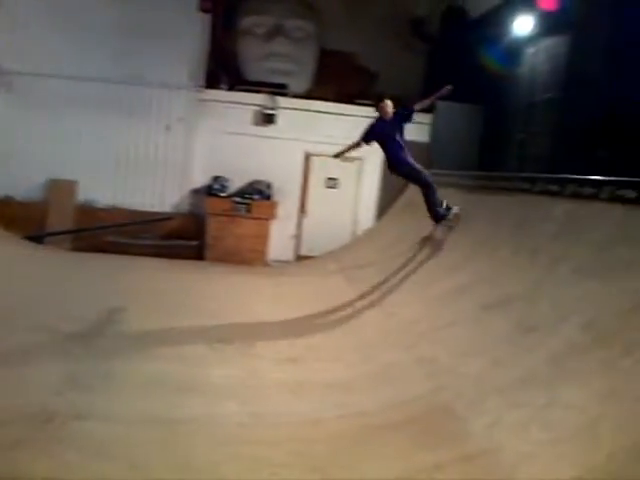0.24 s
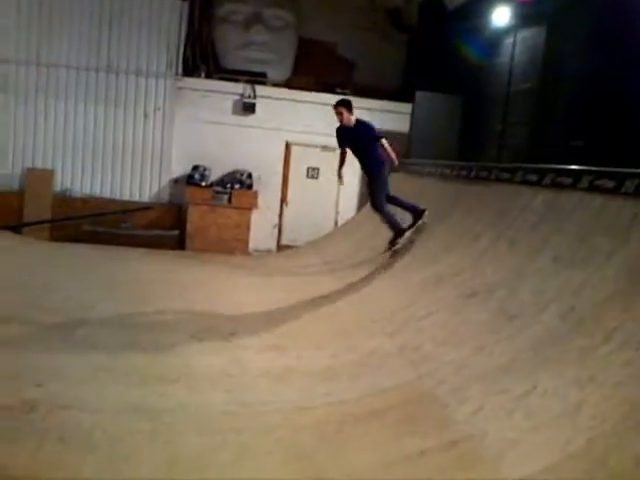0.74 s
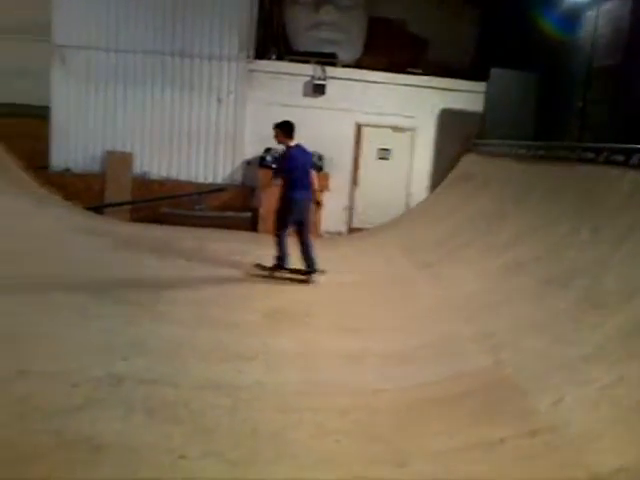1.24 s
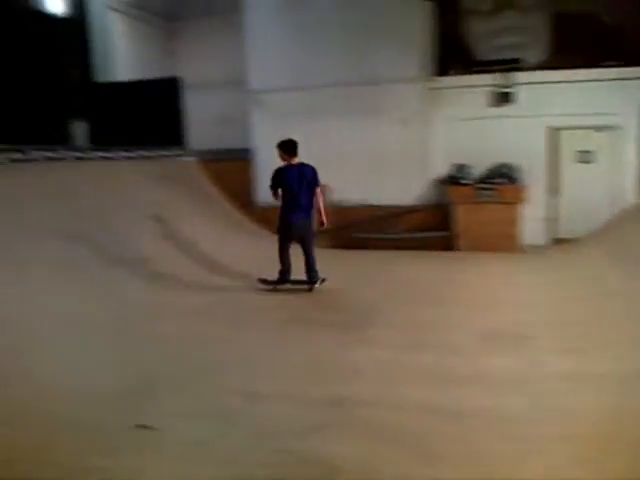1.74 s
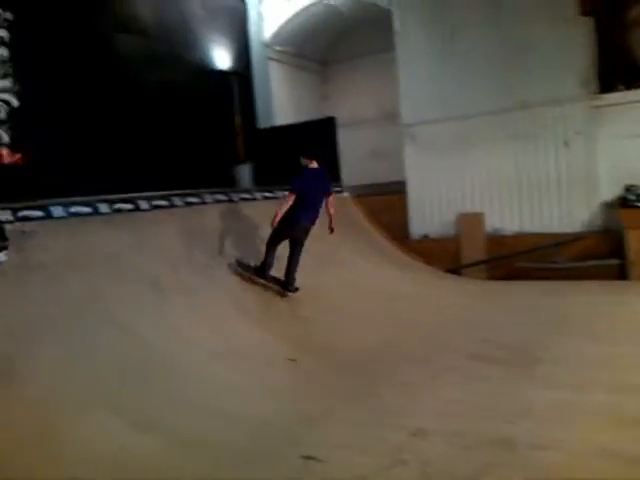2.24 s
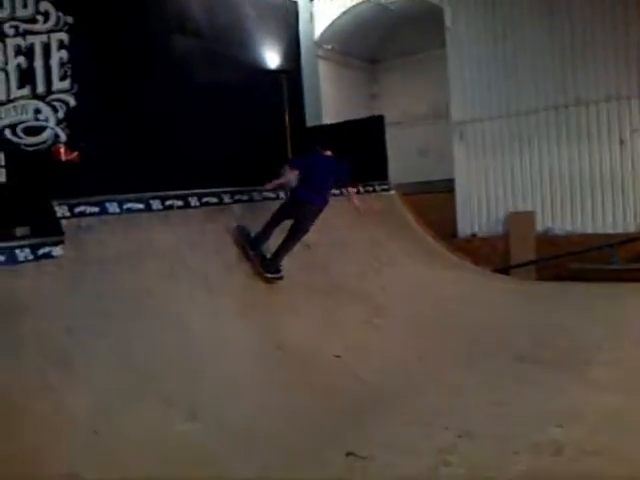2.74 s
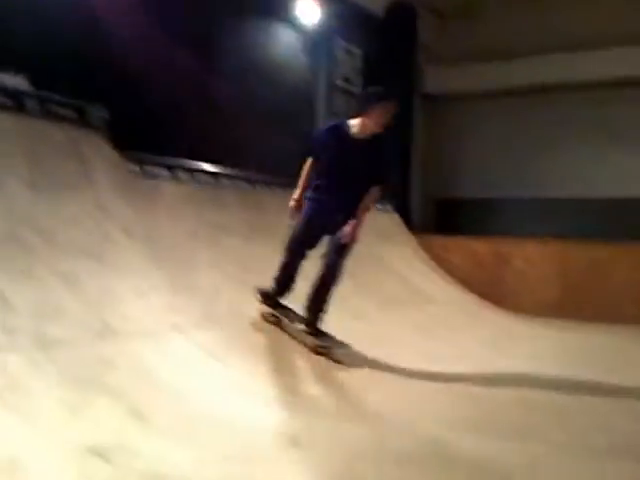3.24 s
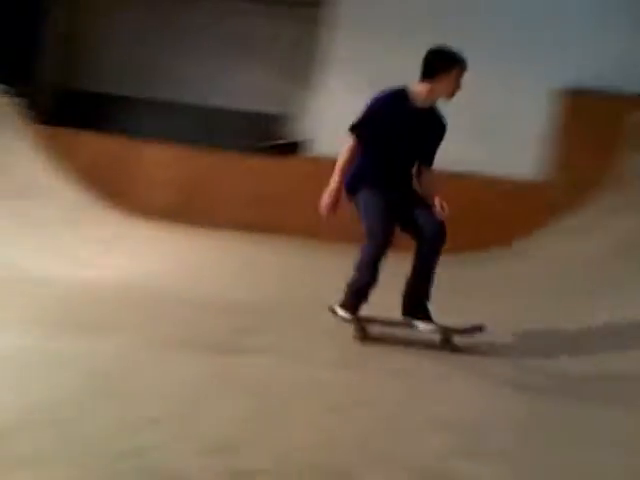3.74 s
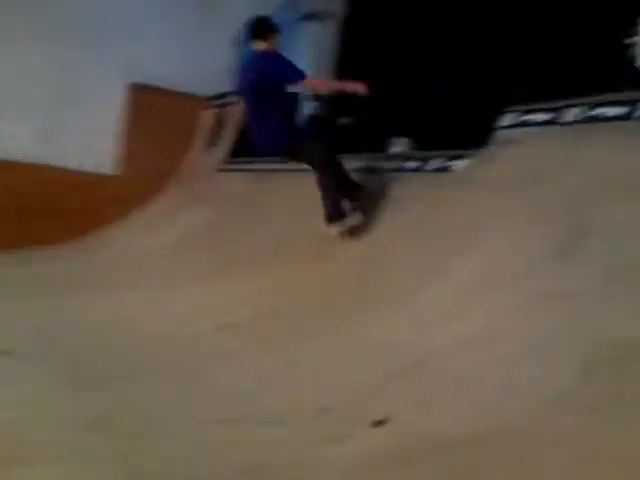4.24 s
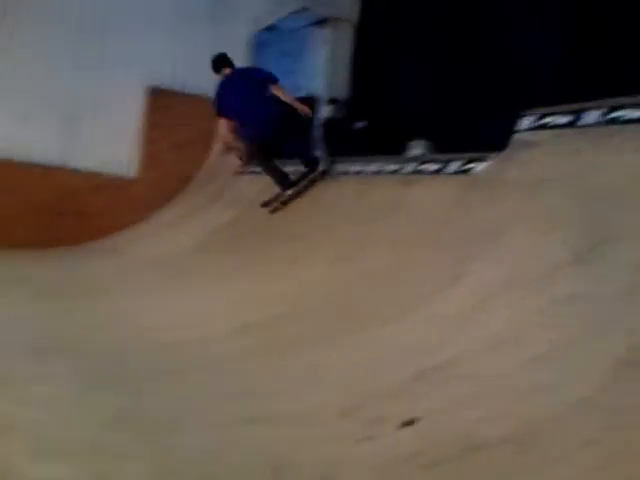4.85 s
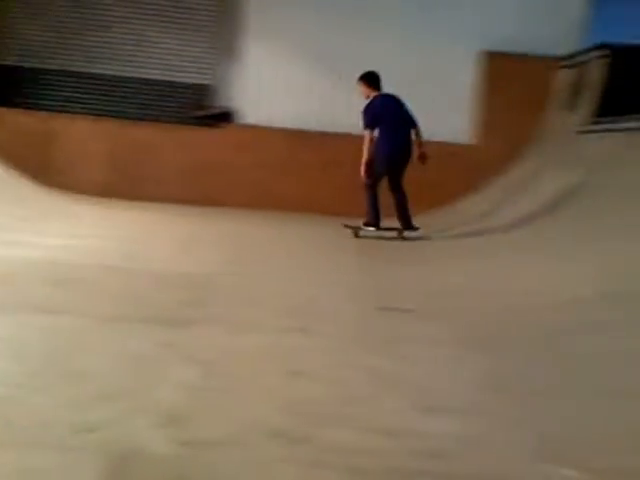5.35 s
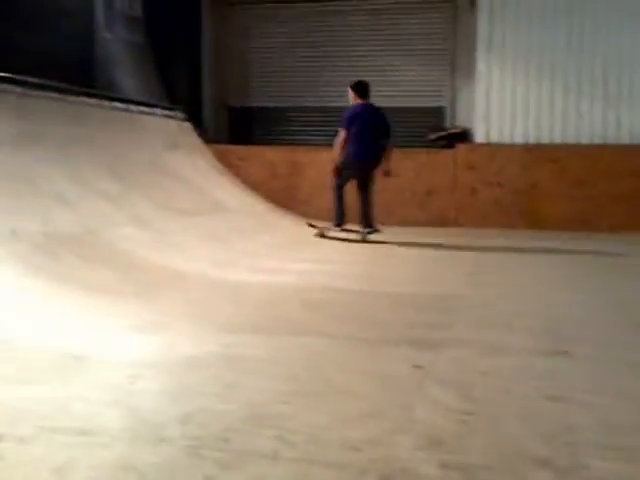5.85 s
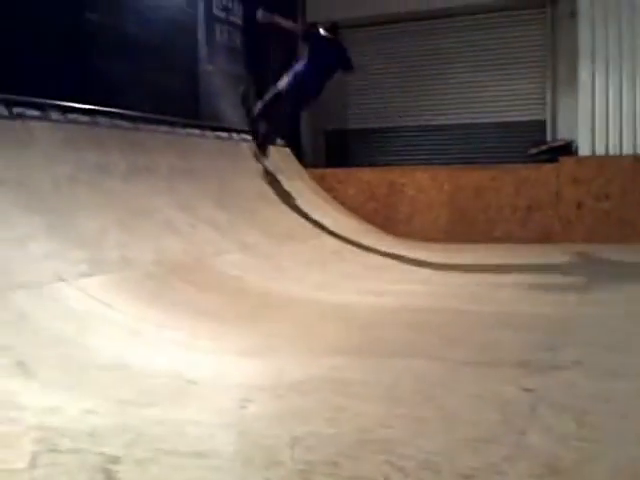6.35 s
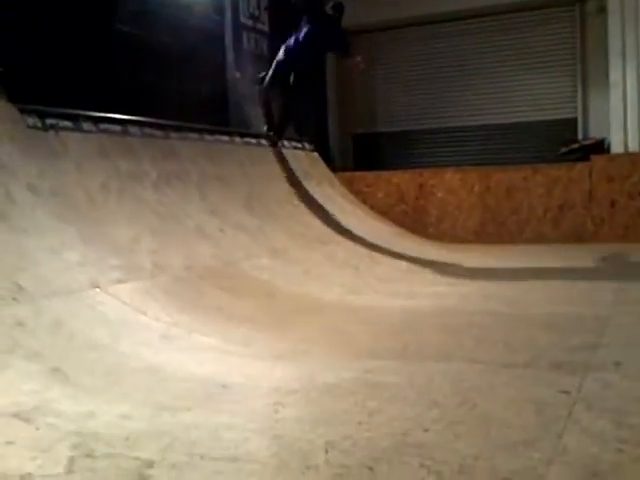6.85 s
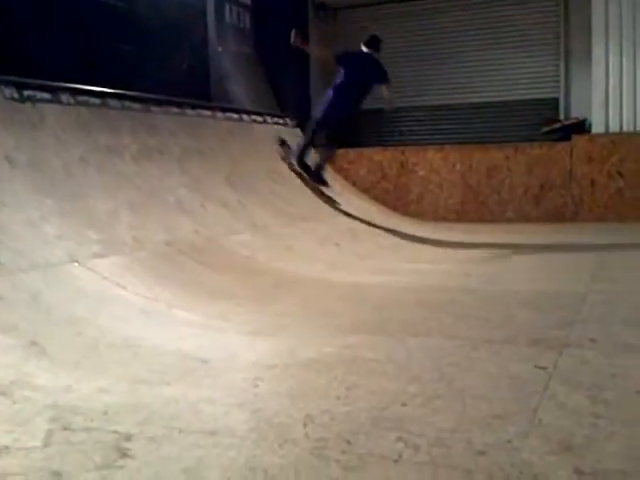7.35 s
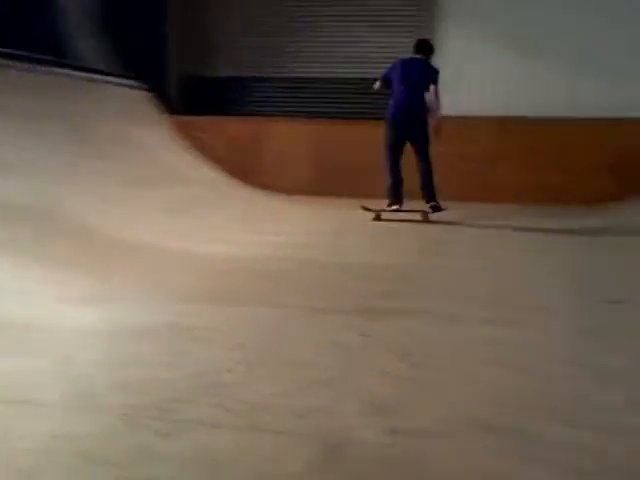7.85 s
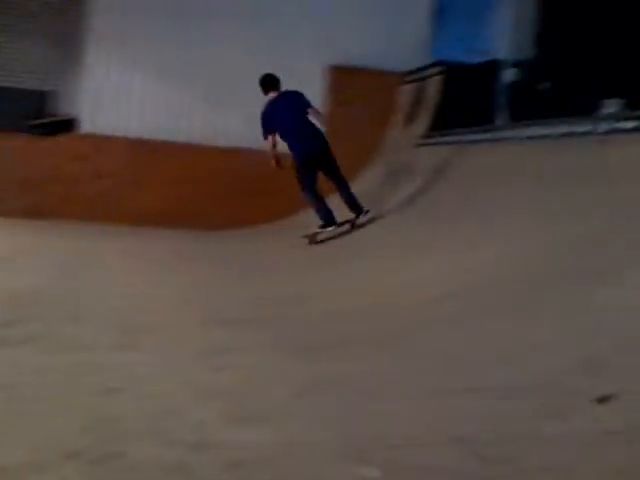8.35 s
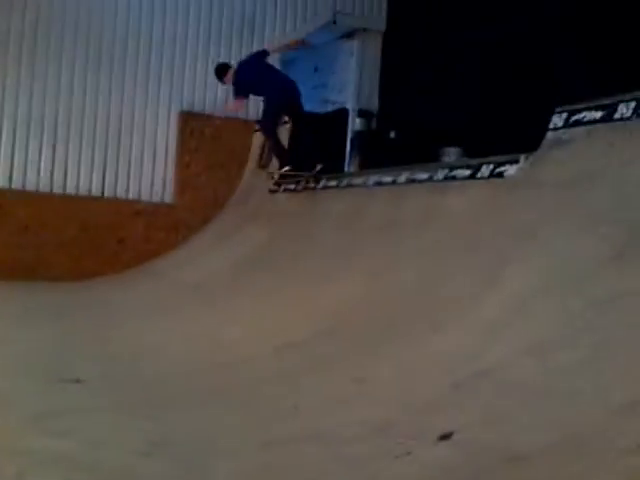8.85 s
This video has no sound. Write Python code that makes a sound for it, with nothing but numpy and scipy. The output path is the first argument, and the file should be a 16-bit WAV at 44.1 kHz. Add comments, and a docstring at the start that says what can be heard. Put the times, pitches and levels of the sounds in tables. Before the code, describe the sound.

In a bare reverberant hall, a skateboard rolls on a plywood ramp over a faint far wash. Low, grainy drumming dips around 0.8 s with a soft knock, swells hollowly at 1 s with a faint sheet hum, then thins after 2.3 s with a weak scrape. Near 2.8 s the level briefly jumps and drops; a snap at 2.9 s, flat slap and small clacks at 3 s lead into louder rolling with bright hiss. At 4.45-4.8 s, sharp clacks, thuds and steel scraping ring out. Rolling resumes until 6.4 s, when a slap, dense hard clacks and grinding burst out, then echo through a near pause. A few light knocks precede a loud clattering landing at 7.2-7.3 s. Rolling swells again, strongest around 8.4 s, fades, and juddering axle knocks and scraping finish at 8.85-9 s. The thin, narrow microphone overloads on the peaks.

```python
"""First, a low drumming on plywood: a skateboard rolls back and forth on a ramp in a bare hall, over a faint far wash.
Rough jolts drive the resonances of sheets, deck and trucks; one far sheet hums. Clacks are snaps, sagging rings and thuds.
Axles scrape the steel coping at the turns, exciting its modes, and each scrape dies away in the hall; wheels slap down
flat and bright rough hiss swells near 3 kHz. The level jumps or dips briefly three times.
A small, thin, overloaded microphone limits and clips it all."""
import sys
import numpy as np
from scipy import signal
from scipy.fft import rfft, irfft, next_fast_len
from scipy.io import wavfile
from scipy.ndimage import uniform_filter1d, minimum_filter1d, map_coordinates

SR = 44100
rng = np.random.default_rng(int(sys.argv[2]) if len(sys.argv) > 2 else 0)


def amplitude_ratio(level_db):
    """Convert a level in decibels to the matching linear amplitude (field) ratio."""
    exponent = np.asarray(level_db, float) / 20
    return 10 ** exponent


def dump_mix(stems):
    """Bounce the given channels to the path in sys.argv[1] as a 16-bit WAV at rate SR."""
    frames = np.atleast_2d(stems).T  # one column per channel
    limited = np.clip(frames, -1, 1)  # hard clip at full scale
    pcm = np.round(limited * 32767).astype(np.int16)
    wavfile.write(sys.argv[1], SR, pcm)


N = 400869  # length [samples]


def unit(x):
    """Scale to rms 1."""
    return x / np.sqrt(np.mean(x ** 2) + 1e-20)


def along(points, hz):
    """(frequency [Hz], value) points read on a log axis."""
    f, v = np.transpose(points)
    return np.interp(np.log(hz + 1), np.log(f + 1), v)


def curve(rows):
    """(time [s], value) rows joined by straight lines, one value per sample."""
    s, v = np.transpose(rows)
    return np.interp(np.arange(N) / SR, np.maximum.accumulate(s), v)


def swells(rows, width_s):
    """A bell-shaped rise in dB around each (time [s], level [dB]) row."""
    return sum(db * np.exp(-((np.arange(N) / SR - s) / width_s) ** 2) for s, db in rows)


def rise_hold_fade(s, length, fade_db_per_s, attack_s=.002):
    """Gain that rises quickly, holds, then fades steadily in dB."""
    t = np.arange(N) / SR - s
    return np.clip(t / attack_s, 0, 1) * amplitude_ratio(-fade_db_per_s * np.clip(t - length, 0, None))


def filtered(x, response):
    """x times a complex response of frequency."""
    m = next_fast_len(N + SR // 2)
    return irfft(rfft(x, m) * response(np.fft.rfftfreq(m, 1 / SR)), m)[:N]


def causal(points):
    """Minimum-phase response with the gain of (Hz, dB) points: nothing sounds before its blow."""
    def response(hz):
        cepstrum = irfft(np.log(amplitude_ratio(along(points, hz))))
        cepstrum[1:len(hz) - 1] *= 2
        cepstrum[len(hz):] = 0
        return np.exp(rfft(cepstrum))
    return response


def modes(table):
    """Causal response of a set of resonances, neighbours in opposite sign."""
    def response(f):
        return sum((-1) ** k * amplitude_ratio(db) * 1j * f * w / (c * c - f * f + 1j * f * w)
                   for k, (c, w, db) in enumerate(table))
    return response


def bumps(spread_db, patchy_db):
    """Tiny jolts from a rough surface: noise with uneven sizes, blurred by smoother and rougher patches."""
    size = map_coordinates(rng.standard_normal(N // 100 + 4), [np.arange(N) / 100])
    z = signal.stft(rng.standard_normal(N) * amplitude_ratio(spread_db * size), nperseg=512)[2]
    field = uniform_filter1d(rng.standard_normal(z.shape), 4, 0)
    field = uniform_filter1d(field, 10, 1)
    return signal.istft(z * amplitude_ratio(patchy_db * unit(field)), nperseg=512)[1][:N]


# strength of the low drumming; from 6.56 to 7.22 s mostly the hall dying away: (time [s], strength [dB])
ROLL = [(0, -14), (.3, -19), (.76, -28), (.95, -18), (1.2, -12.5), (1.65, -14.5), (1.95, -13), (2.3, -17),
        (2.55, -23.5), (2.7, -26.5), (2.8, -30), (2.92, -33), (3.02, -22), (3.11, -15.5), (3.22, -9),
        (3.8, -10.5), (4.3, -10), (4.45, -13), (4.63, -16), (4.86, -13), (5.05, -12.5), (5.3, -9),
        (5.6, -11), (5.97, -10), (6.3, -9), (6.42, -14.5), (6.437, -17), (6.441, -10.5), (6.53, -23),
        (6.56, -28.5), (6.63, -22), (6.72, -25.5), (6.95, -26), (7.222, -33.5), (7.232, -20.5),
        (7.32, -13.5), (7.6, -15), (7.9, -15.5), (8.15, -13), (8.4, -8), (8.62, -12), (8.84, -16.5),
        (9.09, -23)]
# how freely deck and trucks rattle under the rider's weight: (time [s], looseness [dB])
LOOSE = [(0, -0.5), (.75, 1), (1.2, -2.5), (2.3, -3), (2.6, -3), (2.8, -5), (3.0, 1.5), (3.25, -1),
         (3.5, 1.5), (4.4, 1.5), (4.65, 3.5), (4.86, 6), (5.05, 1.5), (5.6, 2), (6.0, -1), (6.4, -2),
         (6.6, -0.5), (6.9, 7.5), (7.3, 5), (7.9, 0), (8.3, -2.5), (8.8, -1), (8.9, -3.5), (9.09, -1)]
# low boom swells over the hollow under the curved sheets, at 7.27 s under the landing thud: (time [s], extra boom [dB])
HOLLOWS = [(.95, 17), (2.1, 7.6), (4.3, 7), (5.0, 6.5), (5.4, 5.9), (6.2, 2), (7.27, 4.7), (8.58, 12)]
# resonances of that space, passed through twice: (frequency [Hz], width per pass [Hz], level per pass [dB])
HOLLOW = [(153, 54, 3.5), (246, 74, 5)]
# resonances of the plywood sheets: (frequency [Hz], width [Hz], level [dB])
SHEETS = [(294, 69, -6), (472.4, 105.4, 0), (645, 129, 1.5), (758.5, 169.5, 1), (952, 403, -7.5)]
# resonances of deck and trucks: (frequency [Hz], width [Hz], level [dB])
DECK = [(1013, 330, 3), (1402, 436, 8), (1599, 557, 6), (2050, 620, -5.5)]
# colour of the tread on the wood grain: (frequency [Hz], level [dB])
TREAD = [(1000, -36), (1800, -14), (2200, 7), (2600, 3.5), (3000, -0.5), (3500, -4.5), (3900, -5.5),
         (4600, -6.5), (5400, -3.5), (6500, -20.5), (9000, -32.5)]
FULL_DB = -10  # strength at full speed
# layers at full speed [dB], and dB gained per dB of strength or looseness
RATTLE_DB, RATTLE_GROWS = -18, 0.51
HISS_DB, HISS_GROWS, HISS_LOOSE = -27, 0.65, 1
BOOM_DB, BOOM_GROWS = -35.5, 1


def wheels():
    """Jolts drum the sheets and the hollow, rattle the deck and hiss under the tread; scrapes add rattle and rasp."""
    drum_db, loose_db = curve(ROLL), curve(LOOSE)
    under_db = drum_db - FULL_DB
    shaken, rasped = scrape_powers()
    rattle_gain = np.sqrt(amplitude_ratio(RATTLE_DB + RATTLE_GROWS * under_db + loose_db) ** 2 + shaken)
    hiss_db = HISS_DB + HISS_GROWS * under_db + HISS_LOOSE * loose_db
    hiss_gain = np.sqrt(amplitude_ratio(hiss_db) ** 2 + rasped)
    boom_db = BOOM_DB + BOOM_GROWS * under_db + swells(HOLLOWS, width_s=0.27)
    drum = unit(filtered(bumps(spread_db=0.7, patchy_db=0.5), modes(SHEETS)))
    rattle = unit(filtered(bumps(spread_db=0.0, patchy_db=0.6), modes(DECK)))
    hiss = unit(filtered(bumps(spread_db=-1.4, patchy_db=1.5), lambda hz: amplitude_ratio(along(TREAD, hz))))
    boom = unit(filtered(bumps(spread_db=-2.0, patchy_db=1.0), lambda hz: modes(HOLLOW)(hz) ** 2))
    return amplitude_ratio(drum_db) * drum + rattle_gain * rattle + hiss_gain * hiss + amplitude_ratio(boom_db) * boom


# colour of the steady far wash in the hall: (frequency [Hz], level [dB])
WASH = [(200, 1), (1000, 10), (3000, -4.5), (4500, 0), (5600, 0), (7000, -10.5)]
WASH_DB = -37


def far_wash():
    """Steady noise coloured like a distant wash."""
    return amplitude_ratio(WASH_DB) * unit(filtered(rng.standard_normal(N), lambda hz: amplitude_ratio(along(WASH, hz))))


# note of one far sheet: (frequency [Hz], width [Hz], level [dB])
HUM = [(361.4, 50, 0)]
# how hard that sheet is driven: (time [s], level [dB])
HUMMING = [(0, -33), (.9, -30), (1.3, -21.5), (1.8, -24.5), (2.05, -23.5), (2.3, -29.5), (2.58, -23),
           (2.75, -40.5), (2.9, -48.5), (9.09, -52.5)]


def hum():
    """A narrow resonance kept alive by the rolling, modelled as filtered noise."""
    return amplitude_ratio(curve(HUMMING)) * unit(filtered(rng.standard_normal(N), modes(HUM)))


# clacks of the board and, from 8.857 s, judder of the axle on the coping:
# (time [s], ring [dB], nominal ring pitch [Hz], snap [dB], thud [dB])
CLACKS = [(0.83, -21, 1980, -34, -23.5), (2.8983, -18.5, 2640, -5.5, -16.5), (3.019, -14.5, 2900, -40, -13),
          (3.036, -15.5, 2130, -17.5, -19.5), (3.056, -9, 2050, -15, -26), (4.437, -21, 2260, -16, -14.5),
          (4.509, -3.5, 2970, -11.5, -1), (4.759, -4, 3380, -20.5, -17.5), (4.8213, -11, 2880, 2.5, -2.5),
          (6.4398, -8.5, 2640, -11.5, -7), (6.5121, 1.5, 1670, -7.5, -15.5),
          (6.5147, -6.5, 3400, -15.5, -23), (6.536, 3.5, 2450, 10.5, -18.5), (6.581, -10, 2194, -22, -34),
          (6.606, -5.5, 1960, -8.5, -24.5), (6.853, -8.5, 3000, -28.5, -37), (7.154, -16, 1756, -35, -27),
          (7.2285, 1.5, 2900, -12, -2), (7.241, -15.5, 2900, -24.5, -10.5),
          (7.245, -9.5, 2020, -14.5, -7.5), (7.2663, 6.5, 2800, -2, -15.5), (7.285, -18, 2180, -27, -6.5),
          (7.3107, 0.5, 2170, -2.5, -8.5), (8.8455, 0.5, 3090, -5.5, -13), (8.8573, -4, 1990, -18, -23),
          (8.884, -5.5, 2300, -10, -9), (8.895, -7.5, 2000, -15.5, -6), (8.91, -8, 1900, -11, -23),
          (8.928, -2.5, 1960, -17.5, -22), (8.978, -7, 2020, -10, -18)]
# every snap leaves a brief bright ping of the trucks; its level is over the snap
PING_HZ, PING_T60_S, PING_DB = 5100, 0.0029, -2.5
# ring of a blow whose snap equals it; dB of length lost per dB of snap over ring
RING_T60_S, SHARP_SHORTENS = .014, .35
RING_ATTACK_S = .0008


def clacks():
    """Each blow is a sharp snap, a rough ring whose pitch sags as contact spreads, and a thud of the sheets."""
    rings, snaps = np.zeros(N + SR), np.zeros(N + SR)
    t = np.arange(SR // 10) / SR
    u = t / .00007
    snap = u * (2 - u) * np.exp(-u)
    ping = amplitude_ratio(PING_DB - 60 * t / PING_T60_S) * np.sin(2 * np.pi * PING_HZ * t)
    snap = snap / snap.max() + ping
    thud = filtered(np.ones(1), modes(SHEETS))[:len(t)]
    thud = thud / thud.max()
    for s, ring_db, hz, snap_db, thud_db in CLACKS:
        t60 = RING_T60_S * amplitude_ratio(SHARP_SHORTENS * (ring_db - snap_db))
        # cycles: the pitch falls from 1.058 to 0.458 of nominal
        cycles = hz * (0.458 * t + .6 * .004 * (1 - np.exp(-t / 0.004)))
        rough = .3 * np.convolve(rng.standard_normal(len(t)), np.hanning(11), 'same')
        rough = rough * np.clip(t60 / 0.021, 0, 2)  # long contacts rattle
        envelope = amplitude_ratio(ring_db - 60 * t / t60) * (1 - np.exp(-t / RING_ATTACK_S))
        ring = envelope * (np.sin(2 * np.pi * cycles) + rough)
        start = round(s * SR)
        rings[start:][:len(t)] += ring + amplitude_ratio(thud_db) * thud
        snaps[start:][:len(t)] += amplitude_ratio(snap_db) * snap
    return rings[:N], snaps[:N]


# how long the bare hall rings: (frequency [Hz], t60 [s])
HALL = [(200, 0.85), (1200, 1.5), (5000, 0.91)]


def hall(x):
    """The hall's answer is noise in which each frequency dies at its own speed, 400 samples late."""
    hz, t, z = signal.stft(rng.standard_normal(SR), SR, nperseg=256)
    decay = amplitude_ratio(-60 * t / along(HALL, hz)[:, None])
    tail = signal.istft(z * decay, SR, nperseg=256)[1]
    return signal.fftconvolve(np.pad(x, (400, 0)), tail / np.linalg.norm(tail))[:N]


# steel coping, groups of low, middle and high modes: (frequency [Hz], width [Hz], level [dB])
COPING = [
    [(744, 91, -3), (1259, 130, 1), (2280, 90, -12), (2800, 120, -11.5)],
    [(1372, 65, 2), (1626, 83, 0), (2500, 98, -11), (3010, 190, -17.5)],
    [(4750, 70, 2.5), (5000, 300, -1), (5700, 200, -4)],
]
# axles on the coping: (time [s], length [s], strength [dB], middle over low ring [dB],
# high ring over scrape hiss [dB], treble level [dB])
GRIND = [(2.471, 0.16, -30.5, 15, -15, -13), (4.448, 0.062, -19, -0.5, -6, -3),
         (4.514, 0.15, -18, -3, 5, 6), (6.431, 0.066, -14.5, -24, -27, -3),
         (6.542, 0.08, -19.5, 12.5, -14, 9), (8.854, 0.07, -14.5, 12, -19, 3.5)]
# after each scrape, body and treble die away in the hall at these rates
GRIND_FADE_DB_PER_S, TREBLE_FADE_DB_PER_S = 22.5, 41
# offset of the treble level, rattle shaken out of the deck and rasp on the wood, over the scrape's strength
TREBLE_DB, SHAKE_DB, RASP_DB = -11.5, 2, -12
CLEAN_DB = 9  # a middle ring this far ahead means a clean slide: half the power shakes the deck
HIGH_DB = 3  # the high ring carries further than the hiss


def scrape_powers():
    """Power the scrapes pass to the deck's rattle and to the rasp on the wood."""
    shaken, rasped = 0, 0
    for s, length, db, middle_db, high_db, _ in GRIND:
        gain = amplitude_ratio(db) * rise_hold_fade(s, length, GRIND_FADE_DB_PER_S)
        shaken = shaken + (amplitude_ratio(SHAKE_DB) * gain) ** 2 / (1 + amplitude_ratio(middle_db - CLEAN_DB) ** 2)
        rasped = rasped + (amplitude_ratio(RASP_DB) * gain) ** 2 / (1 + amplitude_ratio(high_db) ** 2)
    return shaken, rasped


def blend(a, b, db):
    """Mix with b this many dB over a, power held."""
    return (a + amplitude_ratio(db) * b) / np.sqrt(1 + amplitude_ratio(db) ** 2)


def grind():
    """Scraping hisses and excites the steel pipe; where the axle touches decides which modes lead."""
    grit = bumps(spread_db=2.2, patchy_db=1.0)
    low, middle = [unit(filtered(grit, modes(group))) for group in COPING[:2]]
    # the high ring has no body: cut below 4550 Hz
    high = unit(filtered(grit, lambda hz: modes(COPING[2])(hz) / (1 + (4550 / (hz + 1)) ** 24)))
    rub = bumps(spread_db=1.0, patchy_db=.7)
    hiss = unit(filtered(rub, lambda hz: 1 / (1 + (3500 / (hz + 1)) ** 6) / (1 + (hz / 5700) ** 8)))
    total = np.zeros(N)
    for s, length, db, middle_db, high_db, treble_db in GRIND:
        body = rise_hold_fade(s, length, GRIND_FADE_DB_PER_S) * blend(low, middle, middle_db)
        treble = rise_hold_fade(s, length, TREBLE_FADE_DB_PER_S) * blend(hiss, amplitude_ratio(HIGH_DB) * high, high_db)
        total += amplitude_ratio(db) * (body + amplitude_ratio(TREBLE_DB + treble_db) * treble)
    return total


# the level of everything but the wash jumps or dips briefly: (time [s], hold [s], recovery [s], level [dB])
DIPS = [(2.8055, .119, .002, 8), (2.927, .088, .002, -12), (6.543, .008, .04, -3.5)]


def level_steps():
    """Brief level changes in dB, each entered over a short edge."""
    edge_s = .001
    return sum(curve([(s - edge_s, 0), (s, db), (s + hold, db), (s + hold + back, 0)])
               for s, hold, back, db in DIPS)


# wheels slap down flat: (time [s], length [s], level [dB])
SLAPS = [(2.963, 0.0072, -20.5), (3.015, 0.0019, -27), (6.4387, 0.01, -17)]
# colour of the slaps: (frequency [Hz], width [Hz], level [dB])
SLAP = [(1400, 560, 0.0046), (2900, 1400, 0.01)]
SLAP_FADE_DB_PER_S = 1500


def slaps():
    """Each slap is a short burst of rough contact."""
    gain = sum(amplitude_ratio(db) * rise_hold_fade(s, length, SLAP_FADE_DB_PER_S, attack_s=.0008)
               for s, length, db in SLAPS)
    return gain * unit(filtered(rng.standard_normal(N), modes(SLAP)))


# swells of bright rough hiss near 3 kHz: (onset time [s], drive before the envelope [dB])
BRIGHT_SWELLS = [(3.08, -20.5), (4.8, -36.5), (6.56, -19.5), (7.2, -26), (8.2, -29.5)]
# resonance of that hiss, passed through twice: (frequency [Hz], width per pass [Hz], level per pass [dB])
BRIGHT = [(2970, 1000, 0)]
BRIGHT_RISE_S, BRIGHT_FADE_S = 0.22, 0.23


def bright_swells():
    """Each swell is resonant rough noise that builds up and dies away."""
    t = np.clip(np.arange(N) / SR - np.array(BRIGHT_SWELLS)[:, :1], 0, None)
    envelopes = (1 - np.exp(-t / BRIGHT_RISE_S)) * np.exp(-t / BRIGHT_FADE_S) * 2
    gain = amplitude_ratio(np.array(BRIGHT_SWELLS)[:, 1]) @ envelopes
    return gain * unit(filtered(bumps(spread_db=2.5, patchy_db=1.8), lambda hz: modes(BRIGHT)(hz) ** 2))


def scene():
    """All sources together; only the clacks pass through hall(), their snaps more faintly."""
    body, snaps = clacks()
    echo = hall(amplitude_ratio(-6) * body + amplitude_ratio(-18.0) * snaps)
    board = wheels() + hum() + body + snaps + echo + grind() + slaps() + bright_swells()
    return (far_wash() + amplitude_ratio(level_steps()) * board)[None]


def top_cut(x):
    """Nothing passes above the cut-off."""
    return signal.sosfilt(signal.butter(12, 16000, fs=SR, output="sos"), x)


# response of the thin microphone: (frequency [Hz], level [dB])
MIC = [(20, -31), (100, -16), (160, -11), (220, 0.5), (300, 0.5), (2500, -1.5), (3200, -2.5), (3650, -5),
       (3950, -10.5), (5600, -21), (6100, -27.5), (6600, -34.5), (7500, -36), (20000, -69.5)]
# overload ceiling before it wavers, lower at first: (until time [s], amplitude [full scale])
CEILING = [(2.805, .73), (9.1, 1.0)]
# faint dry ticks where the level jumps: (time [s], level [dB])
TICKS = [(2.8045, -21), (2.927, -16)]
BAND_HZ = 8200
KNEE = 60  # how abruptly the ceiling is met
WAVER_DB, WAVER_PER_S = .55, 25  # the ceiling wavers at random
LIMIT_SHARE, LIMIT_S = .35, .0015  # a limiter takes back this share of each overshoot in dB, over this time


def record(dry):
    """Thin microphone over a faint low noise floor, limited, overloaded, narrow band, clipped at full scale."""
    x = filtered(dry[0], causal(MIC))
    x += amplitude_ratio(-74) * unit(filtered(rng.standard_normal(N), lambda hz: 1 / (1 + (hz / 130) ** 4)))
    until, top = np.transpose(CEILING)
    top = top[np.searchsorted(until, np.arange(N) / SR)]
    waver = map_coordinates(rng.standard_normal(N * WAVER_PER_S // SR + 4), [np.arange(N) * WAVER_PER_S / SR])
    top = top * amplitude_ratio(WAVER_DB * waver)
    hold = round(LIMIT_S * SR)
    limit = np.maximum(np.abs(x) / top, 1) ** -LIMIT_SHARE
    x = x * uniform_filter1d(minimum_filter1d(limit, 2 * hold), hold)
    x = x / (1 + np.abs(x / top) ** KNEE) ** (1 / KNEE)
    for s, db in TICKS:
        x[round(s * SR)] += amplitude_ratio(db)
    x = filtered(x, lambda hz: 1 / (1 + (hz / BAND_HZ) ** 40))
    finished = np.clip(x, -1, 1)[None]
    return top_cut(finished)


dry = scene()
out = record(dry)
dump_mix(out)
```